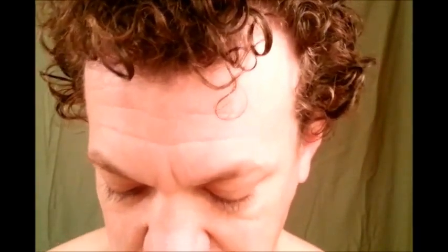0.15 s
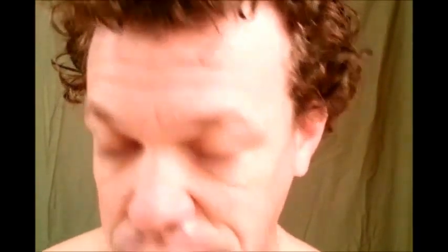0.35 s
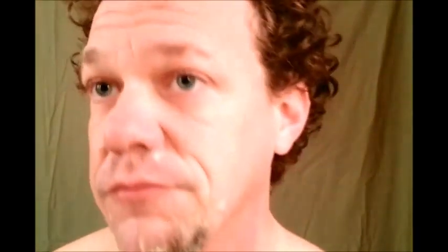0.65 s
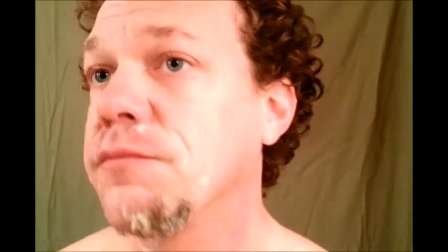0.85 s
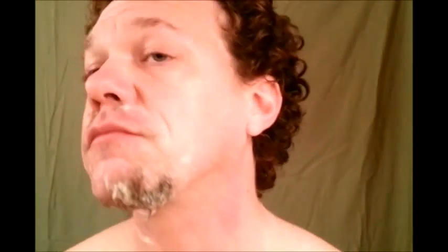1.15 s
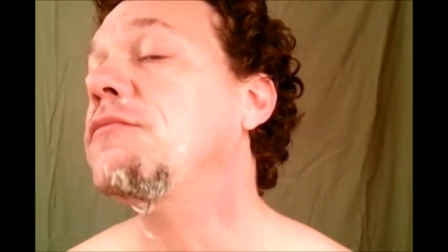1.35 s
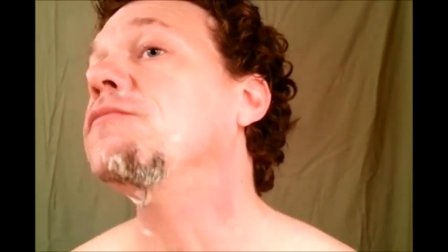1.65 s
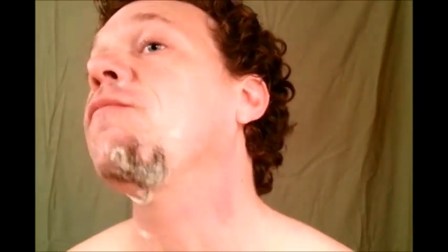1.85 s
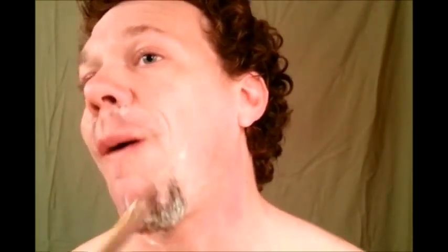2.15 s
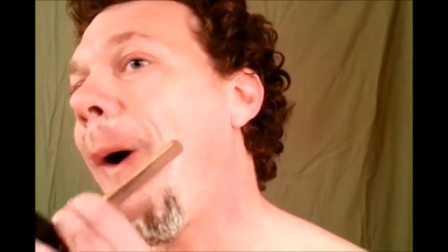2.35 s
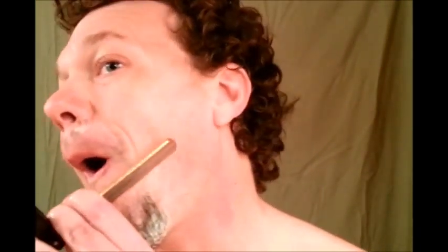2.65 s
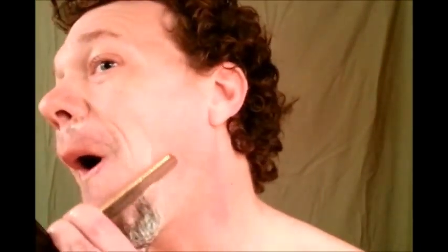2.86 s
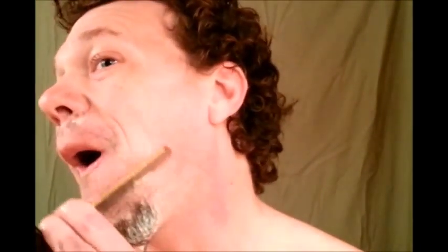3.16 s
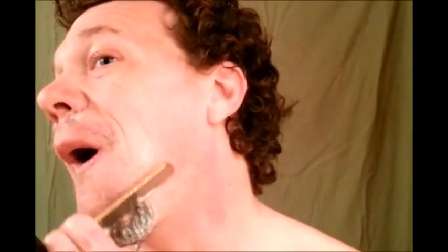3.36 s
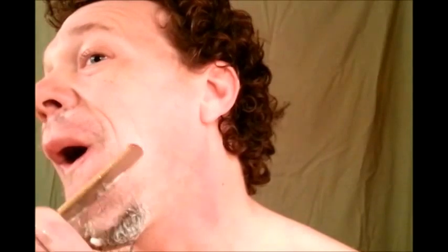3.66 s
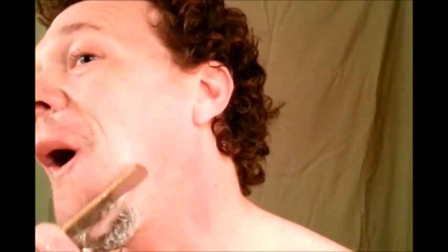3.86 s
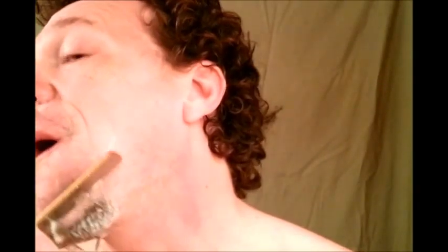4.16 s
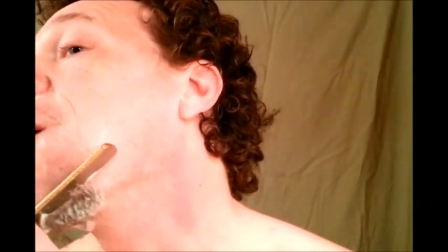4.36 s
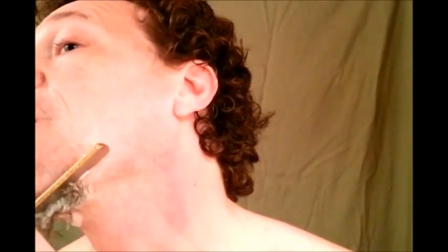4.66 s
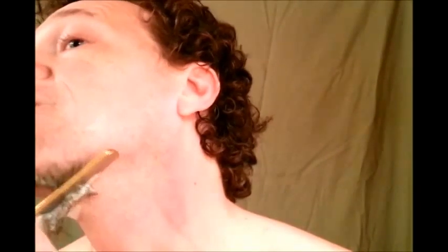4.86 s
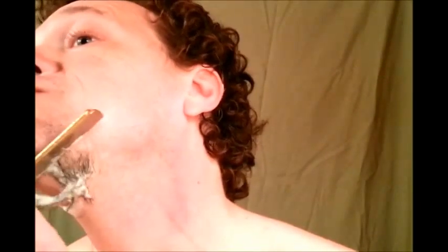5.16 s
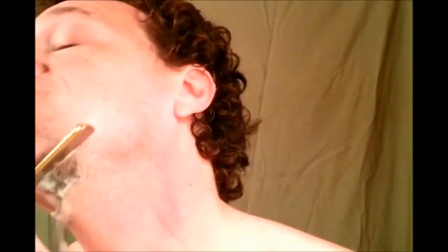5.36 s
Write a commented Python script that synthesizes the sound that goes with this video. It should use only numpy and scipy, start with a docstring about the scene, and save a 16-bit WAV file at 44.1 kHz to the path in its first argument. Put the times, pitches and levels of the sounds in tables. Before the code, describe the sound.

In a small bathroom, a tap splashes into a basin and shuts off almost at once with a low pipe thud. The last water drips and glugs down the drain. After two soft knocks, a straight razor clinks on the rim, then scrapes through stubble in short, crackly strokes, with light knocks between and brief thin squeals near the end. The sound is close, with short wall echoes and a faint house rumble.

```python
"""Over a faint house rumble, a tap splashes into a basin in a small bathroom while the drain throbs.
The valve shuts with a thud at about 0.6 s, and the last water drips and glugs away.
Near 2 s come two soft knocks, then a straight razor clinks on the rim as it is picked up.
From about 2.7 s it scrapes through stubble in short strokes, with more knocks in between: each cut
hair is a tiny snap that rings the thin blade. In the last strokes the blade also squeals briefly."""
import sys
import numpy as np
from scipy import signal
from scipy.fft import rfft, irfft, next_fast_len
from scipy.io import wavfile
from scipy.ndimage import uniform_filter1d

SR = 44100
rng = np.random.default_rng(int(sys.argv[2]) if len(sys.argv) > 2 else 0)


def wav_record(signal):
    """Record a signal, one row per channel, as 16-bit PCM in the file named by sys.argv[1]."""
    frames = np.transpose(np.atleast_2d(signal))
    bounded = np.clip(frames, -1, 1)
    # unit amplitude maps onto the largest positive 16-bit level
    quanta = np.round(bounded * 32767).astype(np.int16)
    wavfile.write(sys.argv[1], SR, quanta)


N = 243431
TIME = np.arange(N) / SR
CUTOFF_HZ = 14700


def from_db(db):
    """Turn decibels (dB) into a number to multiply by."""
    return 10 ** (np.asarray(db) / 20)

def rms_one(x):
    """Scale a sound so that its average strength (rms) is 1."""
    return x / np.sqrt(np.mean(x ** 2) + 1e-20)

def drift(rate):
    """A smooth random wobble of strength 1 that changes about rate times a second."""
    r = np.exp(-80 * np.pi * rate / SR)
    slow = signal.lfilter([1], [1, -2 * r, r * r], rng.standard_normal(N // 40 + 2002))[2000:]
    return np.interp(np.arange(N) / 40, np.arange(len(slow)), rms_one(slow))

def cut(x, hz, kind, order=2):
    """Keep the "low" or the "high" side of hz."""
    return signal.sosfilt(signal.butter(order, min(hz, SR / 2 - 1), kind, fs=SR, output="sos"), x + 1e-18)

def coloured(x, spectrum):
    """Shape the tone of a sound along a curve of (f/Hz, level/dB) points."""
    hz, db = np.transpose(spectrum)
    size = next_fast_len(N)
    bins = np.maximum(np.fft.rfftfreq(size, 1 / SR), 1)
    gain = from_db(np.interp(np.log(bins), np.log(hz), db))
    return irfft(rfft(x, size) * gain, size)[..., :N]

def resonate(x, resonances):
    """Bring out the pitches that an object favours, given as (f/Hz, width/Hz, level/dB) rows."""
    out = 0
    for hz, width, db in resonances:
        r = np.exp(-np.pi * width / SR)
        feedback = [1, -(1 + r * r) * np.cos(2 * np.pi * hz / SR), r * r]
        out = out + from_db(db) * (1 - r * r) / 2 * signal.lfilter([1, 0, -1], feedback, x + 1e-18)
    return out

def ring(x, hz, t60):
    """Each click starts a note; t60 is the seconds it takes to fade by 60 dB."""
    r, w = from_db(-60 / (t60 * SR)), 2 * np.pi * hz / SR
    return signal.lfilter([0, np.sin(w)], [1, -2 * r * np.cos(w), r * r], x + 1e-18)

def clicks(rows):
    """One click for each (t/s, level/dB) row."""
    out = np.zeros(N)
    for s, db in rows:
        out[min(int(s * SR), N - 1)] += from_db(db)
    return out

def struck(rows, notes):
    """Each (t/s, level/dB) row rings all the notes of one object."""
    force = clicks(rows)
    return sum(from_db(db) * ring(force, hz, t60) for hz, db, t60 in notes)

def grains(per_s, spread_db):
    """Random clicks, mostly small, a few large."""
    sizes = from_db(spread_db * np.minimum(rng.exponential(1, N), 4)) * rng.choice([-1, 1], N)
    return sizes * (rng.random(N) < per_s / SR)

def held(start_s, rise_s, hold_s, fade_db_per_s):
    """A volume curve that rises to 1, holds, then fades."""
    age = TIME - start_s
    return np.clip(age / rise_s, 0, 1) * from_db(-fade_db_per_s * np.maximum(age - rise_s - hold_s, 0))

def dying(impacts, t60):
    """A volume curve that jumps at each impact and dies away."""
    return signal.lfilter([1], [1, -from_db(-60 / (t60 * SR))], impacts + 1e-18)

def flurry(impacts, t60):
    """Spread each impact into a dying burst of tiny ones with the same energy."""
    return dying(impacts, t60) * rng.standard_normal(len(impacts)) * np.sqrt(2 * np.log(1000) / (t60 * SR))

def bathroom(x, wet_db, lag_s):
    """The sound arrives directly, lag_s later on the left; wall echoes follow at wet_db against it."""
    early_t60, late_t60 = 0.099, 0.24
    t = TIME[:SR // 2]
    early = rng.standard_normal((2, len(t))) * from_db(-60 * t / early_t60)
    late = cut(rng.standard_normal((2, len(t))), 2400, "low") * from_db(-60 * t / late_t60 - 5)
    walls = (early + late) * np.clip(t / 0.00081, 0, 1)
    walls = walls + cut(walls[::-1] - walls, 550, "low", order=1) / 2   # long waves reach both sides alike
    response = from_db(wet_db) * walls / np.sqrt(np.sum(walls ** 2, axis=1, keepdims=True))
    response[0, round(max(lag_s, 0) * SR)] += 1
    response[1, round(max(-lag_s, 0) * SR)] += 1
    return signal.fftconvolve(x[None], response, axes=1)[:, :N] / np.hypot(1, from_db(wet_db))

def spread_out(source, wet_db, lag_s, count):
    """Play a source at several spots, each with its own direction and echoes."""
    lags = lag_s + .00004 * np.linspace(-1, 1, count)
    return sum(bathroom(source(), wet_db, lag) for lag in lags) / np.sqrt(count)


# the tone of the quiet house: f/Hz, level/dB (levels in all tables are relative)
HOUSE_TONE = [(15, -42), (25, -15), (134, -5), (240, -5.5), (432, -13.5), (549, -13.5), (755, -17),
              (959, -18.5), (1820, -24), (2190, -26), (2440, -24), (3730, -27.5), (7450, -31.5),
              (8070, -29), (14500, -30)]
# its stereo width, side against middle: f/Hz, level/dB
HOUSE_WIDTH = [(60, -3.5), (250, -3.5), (700, 0), (2000, 0), (10000, 0)]
# the hum of mains electricity: f/Hz, level/dB
MAINS_HUM = [(60, -70.5), (119.5, -66.5)]
def background():
    """The house rumbles, hisses and hums faintly all the way through."""
    middle, side = rms_one(coloured(rng.standard_normal((2, N)), HOUSE_TONE))
    air = from_db(-58) * (middle + coloured(side, HOUSE_WIDTH) * [[1], [-1]])
    return air + sum(from_db(db) * np.sqrt(2) * np.sin(2 * np.pi * hz * TIME) for hz, db in MAINS_HUM)

# the tone of water hitting the basin: f/Hz, level/dB
SPRAY_TONE = [(88, -49), (150, -9), (228, -12), (271, -19), (383, -3.5), (464, -11), (572, -8.5),
              (618, -11.5), (1410, -13), (1670, -10.5), (2140, -8), (4100, -3.5), (5570, -8.5),
              (9520, -8.5), (14500, -15.5)]
def tap():
    """The jet breaks into splashes and beats bubbles into the water, then dies as the valve closes."""
    shut_s, fade_db_per_s = 0.59, 126
    flow = from_db(-36 - fade_db_per_s * np.maximum(TIME - shut_s, 0))
    flicker = from_db(.7 * drift(61))

    def patch():
        spray = flicker * rms_one(coloured(grains(520, spread_db=4.2), SPRAY_TONE))
        # the hollow that the jet digs plops again and again
        plops = rms_one(resonate(grains(260, spread_db=6), [(1720, 160, 0)]))
        bubbles = bubbling(.8, 2400, 4800, spread_db=14, count=45)
        return flow * (from_db(3) * spray + from_db(-6.5) * plops + from_db(-6) * bubbles)
    return spread_out(patch, wet_db=7, lag_s=.00005, count=3)

def bubbling(until_s, low_hz, high_hz, spread_db, count):
    """Random bubbles each ring for some thirty cycles, rising in pitch as they near the surface."""
    out = np.zeros(N)
    for when, size, pitch in rng.random((count, 3)):
        hz = low_hz * (high_hz / low_hz) ** pitch
        turns = hz * TIME[:int(32 * SR / hz)]
        life, at = turns / turns[-1], int(when * until_s * SR)
        note = np.sin(2 * np.pi * turns * (1 + .04 * life))
        out[at:at + len(turns)] += from_db(spread_db * size ** 2 - 60 * life) * note
    return rms_one(out) * np.sqrt(until_s * SR / N)

OVERTONE_RATIO, OVERTONE_DB = 1.33, -16.5   # the waste pipe's fainter, higher note
# air gulped through the drain: t/s, length/s, level/dB, f/Hz
GULPS = [(0.328, 0.078, -34.5, 227), (0.702, 0.053, -32.5, 226), (0.758, 0.035, -43, 238),
         (0.818, 0.049, -43, 313), (0.952, 0.037, -37.5, 244), (0.98, 0.046, -44, 369),
         (1.065, 0.05, -31.5, 233), (1.104, 0.033, -34.5, 245), (1.137, 0.032, -35, 239),
         (1.178, 0.058, -36.5, 234), (1.231, 0.071, -33, 236.4), (1.268, 0.08, -31, 232.8),
         (1.308, 0.079, -33, 237), (1.488, 0.045, -41, 253), (1.54, 0.033, -40, 255),
         (1.574, 0.038, -36.5, 256.4)]
def drain():
    """Air in the waste pipe throbs and gulps as water runs through; it climbs once the basin is dry."""
    dry_from_s, climb_hz_per_s = 1.34, 105
    hz = 234 + climb_hz_per_s * np.maximum(TIME - dry_from_s, 0)
    phase = 2 * np.pi * np.cumsum(hz) / SR
    draining = from_db(-49) * held(0, rise_s=0.26, hold_s=1.2, fade_db_per_s=24)

    def throb(phase, rate):
        return drift(rate) * np.cos(phase) + drift(rate) * np.sin(phase)
    air = draining * throb(phase, rate=19.5)
    gulps = from_db(-0.5) * sum(gulp(*row) for row in GULPS)
    overtone = from_db(OVERTONE_DB) * draining * throb(OVERTONE_RATIO * phase, rate=50)
    return bathroom(cut(air + gulps + overtone, 188, "high", order=4), wet_db=-14, lag_s=.0001)

# the hollows of the basin and its waste pipe: f/Hz, width/Hz, level/dB
BASIN_HOLLOWS = [(425, 330, 15), (820, 70, 13), (1379, 45, 16.5), (1930, 120, 6.5), (2476, 35, 20.5),
                 (2853, 43, 16), (3560, 160, 11.5), (4000, 340, 11), (4680, 280, 7.5), (8900, 2000, -14)]
# single drops: t/s, splat level/dB, bubble level/dB, bubble f/Hz, bubble t60/s
WATER_DROPS = [(0.011, -25, -28, 4100, 0.0043), (.049, -28, -11.5, 3700, 0.0025),
               (.062, -42, -28, 3320, 0.0076), (0.121, -19, -10.5, 1900, 0.0066),
               (0.2233, -31, -21, 1640, 0.01), (.275, -24, -38, 4040, 0.0065),
               (0.292, -40, -20.5, 4090, 0.011), (0.318, -34, -18.5, 4210, .01),
               (.419, -31, -23, 8260, 0.0029), (0.505, -25, -24.5, 2930, 0.011),
               (.518, -35, -27, 2450, 0.0055), (0.543, -43, -27.5, 3300, 0.021),
               (0.622, -37, -23, 8260, 0.0033), (0.646, -32, -29.5, 4570, 0.0061),
               (.663, -34, -31.5, 3560, 0.01), (.708, -35, -33, 6800, 0.0033),
               (0.734, -30, -27, 7800, 0.0014), (0.775, -31, -46, 2395, 0.043),
               (.783, -37.5, -44, 5470, 0.01), (0.832, -29, -41, 9840, .008),
               (0.84, -27.5, -33.5, 4700, 0.011), (.848, -50, -38, 3800, 0.01),
               (0.934, -36.5, -35.5, 925, 0.09), (.936, -43, -47, 4300, .015),
               (0.965, -41, -46, 2670, 0.012), (1.052, -38, -42, 3720, 0.019),
               (1.074, -26.5, -28.5, 7700, 0.0019), (1.111, -55, -44, 3640, 0.028),
               (1.143, -29, -43.5, 3470, .018), (1.174, -31, -41, 3900, 0.015),
               (1.189, -49, -41, 2400, 0.039), (1.2, -48, -42, 2850, 0.021),
               (1.232, -29, -39.5, 2426, 0.047), (1.258, -32.5, -47, 3840, 0.0099),
               (1.277, -31, -51, 4400, 0.016), (1.326, -30.5, -45, 9400, 0.005),
               (1.347, -40, -40, 1920, 0.022), (1.433, -23.5, -42, 2360, 0.057),
               (1.476, -32, -34, 1340, 0.027), (1.504, -35, -37.5, 8870, 0.0096),
               (1.526, -44, -30.5, 944, 0.046), (1.546, -33, -39.5, 2530, 0.021),
               (1.582, -34, -39.5, 2300, 0.014), (1.586, -51, -34.5, 933, 0.041),
               (1.654, -50, -51, 3830, 0.022), (1.817, -70, -46, 2700, 0.018),
               (1.957, -49, -50.5, 3730, 0.04)]
def drips():
    """Drops throw up droplets that plink as they land; a thin, uneven trickle outlasts the jet."""
    impacts = clicks([(s, splat_db) for s, splat_db, *bubble in WATER_DROPS])
    spatter = from_db(-16.5) * dying(impacts, t60=0.11)
    spurts = from_db(-54.5 + 2 * drift(30))
    trickle = spurts * held(0.75, rise_s=0.032, hold_s=0.66, fade_db_per_s=19)

    def patch():
        patter = rms_one(resonate(grains(160, spread_db=3), BASIN_HOLLOWS))
        fizz = bubbling(2, 1100, 5200, spread_db=10, count=55)
        plinks = bubbling(2, 1200, 9000, spread_db=8, count=240)
        droplets = spatter * (from_db(0.5) * patter + from_db(-8) * plinks)
        return droplets + trickle * (from_db(-3) * patter + from_db(-4.5) * fizz)
    trickling = spread_out(patch, wet_db=6, lag_s=.00005, count=2)
    return trickling + bathroom(sum(drop(*row) for row in WATER_DROPS), wet_db=2, lag_s=.00005)

def drop(s, splat_db, bubble_db, hz, t60):
    """A drop splats and leaves one larger bubble, whose pitch rises as it nears the surface."""
    hit, at = signal.unit_impulse(SR // 8), int(s * SR)
    t = TIME[:len(hit)]
    life, rise = np.minimum(t / t60, 2), 0.14
    splat = resonate(flurry(hit, t60=0.011), BASIN_HOLLOWS)
    splat += from_db(1) * np.sqrt(hz / 4000) * tiny_bubbles(hz, count=14)
    bubble = from_db(bubble_db - 60 * life) * np.sin(2 * np.pi * hz * t * (1 + rise * life / 2))
    out = np.zeros(N)
    out[at:at + len(hit)] = from_db(splat_db) * splat + from_db(8) * cut(bubble, 2200, "high")
    return out

def tiny_bubbles(hz, count):
    """A splat traps tiny bubbles around one pitch, one soon after another."""
    spread_octaves, scatter_s, ring_cycles = .36, .004, 30
    t, out = TIME[:SR // 8], 0
    for order, (detune, wait) in enumerate(rng.standard_normal((count, 2))):
        pitch = min(hz * 2 ** (spread_octaves * detune), CUTOFF_HZ)
        turns = pitch * np.maximum(t - scatter_s * abs(wait) * min(order, 1), 0)
        out = out + from_db(-60 * np.minimum(turns / ring_cycles, 2)) * np.sin(2 * np.pi * turns)
    return out / np.sqrt(np.sum(out ** 2))

def gulp(s, length_s, db, hz):
    """A pocket of air swells quickly and fades in the waste pipe, wavering and rising a little."""
    life, rise = np.clip((TIME - s) / length_s, 0, 1), 0.031
    turns = hz * length_s * life * (1 + rise * (life - 1) / 2)
    phase = 2 * np.pi * (turns + rng.random()) + 0.21 * drift(13)
    swell = from_db(db) * np.sin(np.pi * life ** .8) ** 2
    return swell * (np.sin(phase) + from_db(OVERTONE_DB) * np.sin(OVERTONE_RATIO * phase))

# the valve shutting: t/s, level/dB
VALVE_BLOW = [(0.584, -19.5)]
# the notes of the water pipe: f/Hz, level/dB, t60/s
PIPE_NOTES = [(130.6, -7.5, 0.21), (164, -14, 0.13), (515, -17, 0.071), (662, -0.5, 0.015), (898, -19, .05)]
def valve_thud():
    """The valve shuts and jolts the pipe into a low thud."""
    thud = cut(struck(VALVE_BLOW, PIPE_NOTES), 92, "high", order=4)
    return bathroom(thud, wet_db=7.5, lag_s=.00005)

# soft knocks and pops: t/s, level/dB, f/Hz, t60/s
SOFT_KNOCKS = [(1.951, -12.5, 840, 0.0005), (1.994, -27, 1580, 0.004), (2.548, -49.5, 563, 0.0093),
               (3.689, -38, 700, 0.0063), (4.331, -31.5, 786, 0.0026), (4.343, -21, 1050, 0.0034),
               (5.011, -38, 1220, 0.0042), (5.133, -38, 524, 0.0086), (5.513, -44.5, 1060, 0.019)]
def knocks():
    """Each soft touch rings one note that dies almost at once, with little sound far above or below."""
    pops = 0
    for s, db, hz, t60 in SOFT_KNOCKS:
        pop = ring(clicks([(s, db)]), hz, t60)
        pops = pops + cut(cut(pop, 1.7 * hz, "low", order=4), .45 * hz, "high")
    return from_db(7) * pops

# a light touch and one main clink on the rim, then two quick echoes: t/s, level/dB
CLINK_AND_ECHOES = [(2.1018, -26), (2.1044, -24.5), (2.1057, -13), (2.1112, -31), (2.1161, -23)]
# the notes of steel on the rim: f/Hz, level/dB, t60/s
RIM_NOTES = [(1090, -20.5, 0.032), (1404, -22, 0.025), (2950, -14, 0.036), (3065, 3, 0.032),
             (3136, -5, 0.036), (3360, -18, 0.021), (4100, -16, 0.029), (7950, -14.5, 0.016)]
def razor_clink():
    """The lifted razor touches the rim, clinks once and skids on the glaze; two quick echoes follow."""
    clink = cut(struck(CLINK_AND_ECHOES, RIM_NOTES), 1070, "high", order=1)
    skid = resonate(flurry(clicks(CLINK_AND_ECHOES), t60=0.068), [(7000, 2000, 7.5), (13000, 3960, -8)])
    return bathroom(from_db(1.5) * (clink + skid), wet_db=2, lag_s=0.00023)

# light blows on the handle: t/s, level/dB
HANDLE_BLOWS = [(2.648, -43.5), (2.653, -39), (2.757, -49)]
# the notes of the handle: f/Hz, level/dB, t60/s
HANDLE_NOTES = [(585, -11, 0.013), (1150, -2, 0.015), (1376, 5.5, 0.0052), (1880, 6.5, 0.038),
                (2180, 0, 0.011), (2675, -4, 0.048)]
def handle_clacks():
    """Light clacks, as of the razor's handle shifting in the hand."""
    return cut(struck(HANDLE_BLOWS, HANDLE_NOTES), 520, "high")

# stiff hairs that snap one at a time: t/s, level/dB
STIFF_HAIRS = [(2.7432, -24), (2.7945, -27), (2.8479, -15), (3.031, -24), (3.0535, -10.5), (3.1123, -16.5),
               (3.559, -22.5), (3.8477, -23.5), (3.8761, -16.5), (4.0577, -12), (4.1264, -24.5),
               (4.4174, -15.5), (4.569, -20.5), (4.4588, -15), (4.491, -33), (4.614, -35), (4.6875, -32),
               (4.7676, -23), (4.8584, -22)]
# the tone of the blade against the skin: f/Hz, width/Hz, level/dB
BLADE_TONE = [(520, 3100, -9.5), (1000, 59, 1), (1384, 95, -0.5), (2216, 184, 4.5), (2650, 290, -2.5),
              (4250, 320, 2.5), (4790, 1340, 6.5), (6710, 2400, 4.5), (8050, 2700, -19),
              (11600, 17000, -18)]
def hair_snaps():
    """A stiff hair parts in a brief flurry of tiny impacts that ring the blade."""
    snaps = from_db(-3.5) * resonate(flurry(clicks(STIFF_HAIRS), t60=0.011), BLADE_TONE)
    return bathroom(snaps, wet_db=4, lag_s=.00015)

# razor strokes: t/s, swell/s, fade/s, landing level/dB, firmest level/dB, treble level/dB,
# ring of the edge f/Hz, ring level/dB against the scrape
RAZOR_STROKES = [(2.769, 0.048, 0.046, -52, -47, -18, 4340, -16),
                 (2.855, 0.036, 0.47, -46, -44.5, -2.5, 4280, -22),
                 (2.913, 0.14, 0.057, -56, -40, 1.5, 8600, -7),
                 (3.343, 0.17, 0.096, -57, -33.3, -0.5, 4830, -5),
                 (3.842, 0.085, 0.19, -60.5, -34.5, 0.5, 6560, -8),
                 (4.41, 0.0052, 0.14, -43, -45, 1, 7500, -12),
                 (4.556, 0.027, 0.09, -50.5, -42.5, -8, 4200, -19),
                 (4.677, 0.185, 0.053, -45.5, -46, -7, 5900, -16),
                 (5.329, 0.06, 0.41, -68, -45, 0.5, 4570, -5.5)]
def shaving():
    """The edge cuts hairs in clumps; a firmer stroke cuts more each second and sounds brighter."""
    presses = [(pressure(*shape), treble_db, hz, db) for *shape, treble_db, hz, db in RAZOR_STROKES]
    force = sum(press for press, *colour in presses)
    bite = sum(press * from_db(treble_db) for press, treble_db, *note in presses)
    effort = np.clip(force / from_db(-32), .01, 1)
    hairs_per_s = 1200 * effort ** 0.5
    clumps = catching()

    def edge():
        hairs = rms_one(grains(hairs_per_s, spread_db=4) / np.sqrt(hairs_per_s))
        contact = (hairs + from_db(-13) * rng.standard_normal(N)) * clumps
        scrape = rms_one(resonate(contact, BLADE_TONE))
        treble = cut(scrape, 8100, "high", order=1)
        cutting = force * (scrape - treble) + bite * (1 + 0.3 * effort) * treble
        rubbing = clumps * rng.standard_normal(N)
        # the angle and grip of each stroke give the edge its own pitch
        rasp = sum(press * from_db(db) * rms_one(resonate(rubbing, [(hz, 280, 0)]))
                   for press, _, hz, db in presses)
        return from_db(0.5) * cutting + rasp + squeals(contact)
    return spread_out(edge, wet_db=6, lag_s=0.00017, count=3)

def pressure(start_s, swell_s, fade_s, landing_db, firmest_db):
    """The blade lands on the skin, settles to its firmest push and eases off."""
    age = TIME - start_s
    to_go = np.clip(1 - age / swell_s, 0, 1)
    past = np.clip((age - swell_s) / fade_s, 0, None)
    db = firmest_db + (landing_db - firmest_db) * to_go ** 1.7 - 28.5 * past ** 1.3
    landing = np.clip(age / 0.0016, 0, 1)
    return landing * from_db(np.maximum(db, -200))

def catching():
    """The edge catches on uneven rows of hairs, then slips back to a smooth glide."""
    rows_per_s, glide = 125, .25
    passed = np.floor(np.cumsum(rows_per_s * from_db(3 * drift(150))) / SR)
    catches = np.diff(passed, prepend=0) * from_db(rng.uniform(-3, 3, N))
    return rms_one(glide + dying(catches, t60=.014))

# the loudest moment of each squeal: t/s, level/dB
SQUEAL_PEAKS = [(4.769, -36), (4.861, -37), (5.385, -50)]
# the note the blade sings: f/Hz, width/Hz, level/dB
SQUEAL_TONE = [(4730, 390, -8), (4670, 490, -11)]
def squeals(contact):
    """On slow strokes under the jaw the blade sings a note that builds quickly and dies away."""
    rise_db_per_s, fall_db_per_s = 595, 650
    swell = sum(from_db(db - np.maximum(rise_db_per_s * (s - TIME), fall_db_per_s * (TIME - s)))
                for s, db in SQUEAL_PEAKS)
    return from_db(-3.5) * swell * rms_one(resonate(contact, SQUEAL_TONE))


def scene():
    """Water first, then the razor, all over the quiet sound of the house."""
    thud, clink = valve_thud(), razor_clink()
    water = tap() + drain() + drips()
    handling = bathroom(knocks() + handle_clacks(), wet_db=4, lag_s=-.00009)
    return water + thud + clink + handling + shaving() + hair_snaps() + background()

def record(dry):
    """The recorder turns down its deep bass while the treble is loud, and cuts off the very top."""
    treble = cut(dry.mean(0), 930, "high")
    loudness = np.sqrt(np.abs(uniform_filter1d(treble ** 2, size=SR // 12)))
    dip = 1 / (1 + (from_db(-50) / (loudness + 1e-9)) ** 2)
    bass = coloured(dry, [(70, -2), (130, -7), (200, -52)])
    return signal.sosfilt(signal.ellip(12, .1, 90, CUTOFF_HZ, fs=SR, output="sos"), dry - dip * bass)


dry = scene()
out = record(dry)
wav_record(out)
```